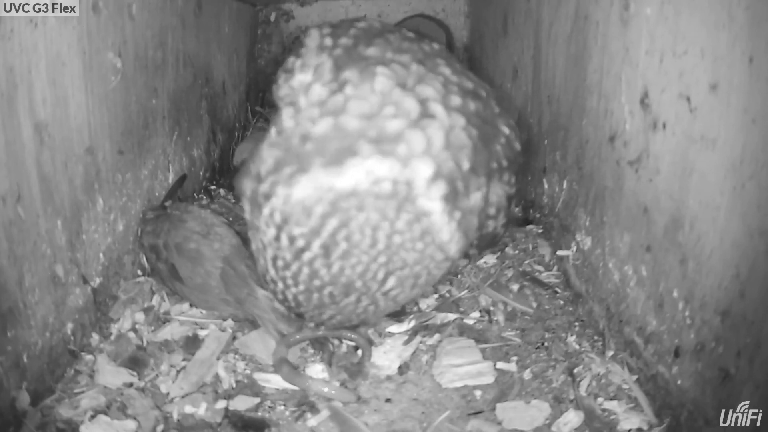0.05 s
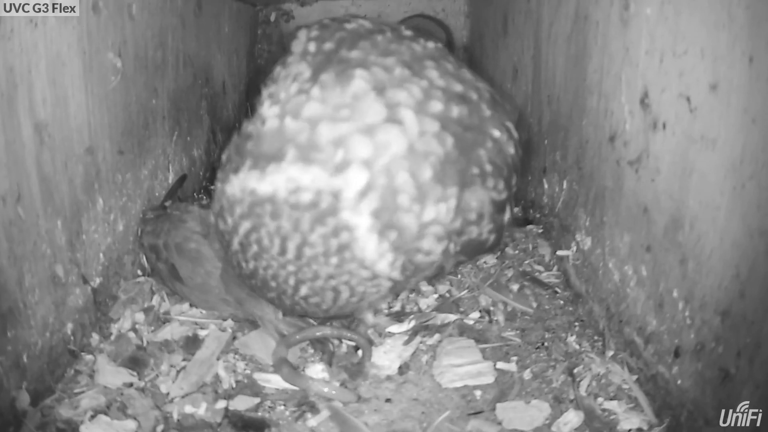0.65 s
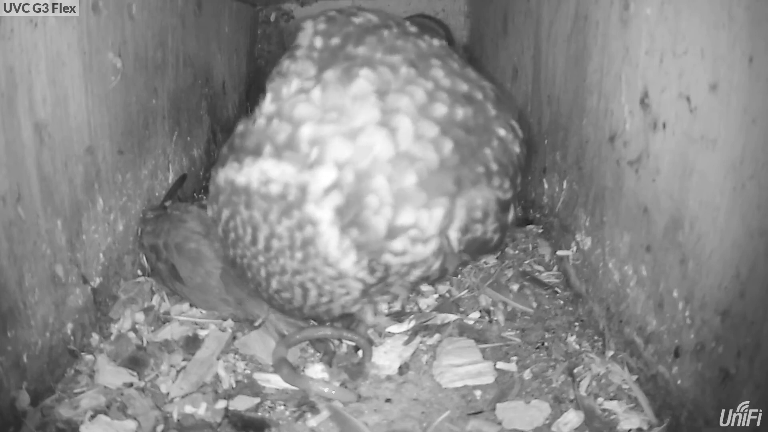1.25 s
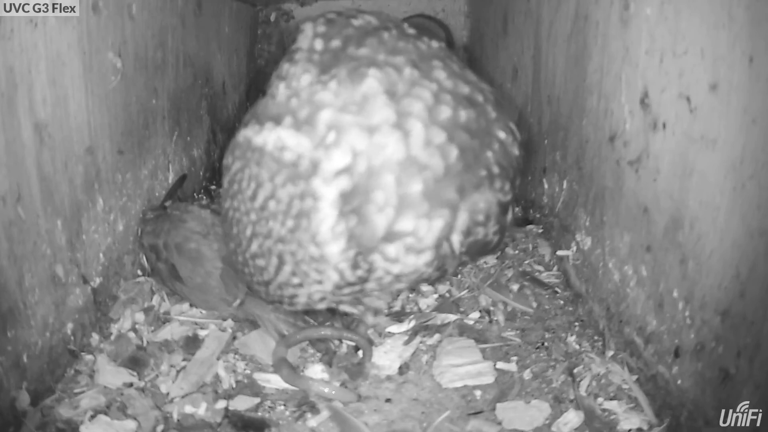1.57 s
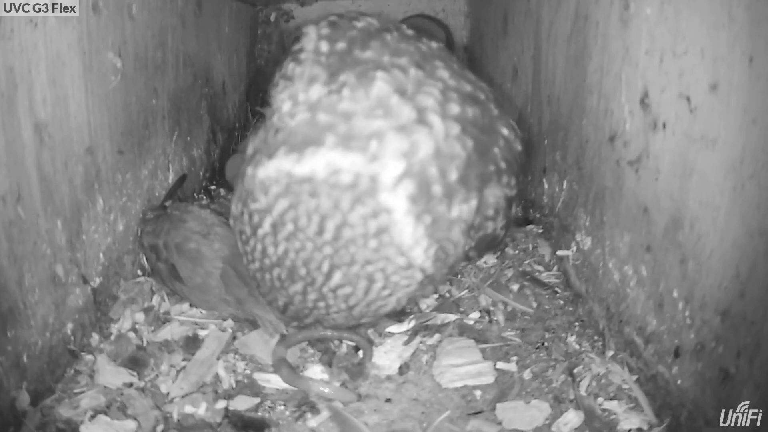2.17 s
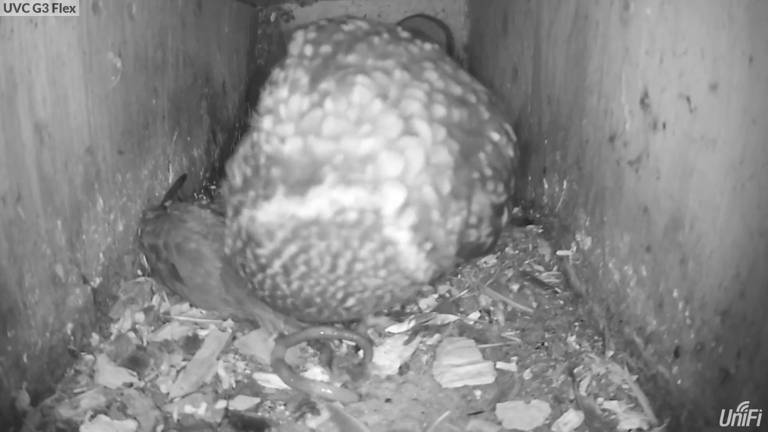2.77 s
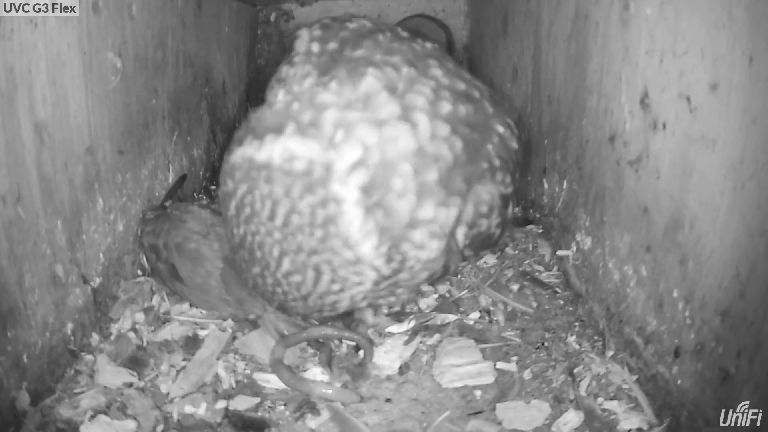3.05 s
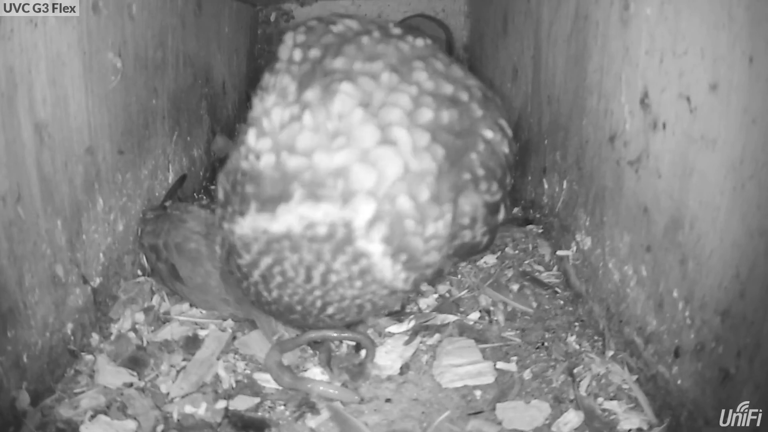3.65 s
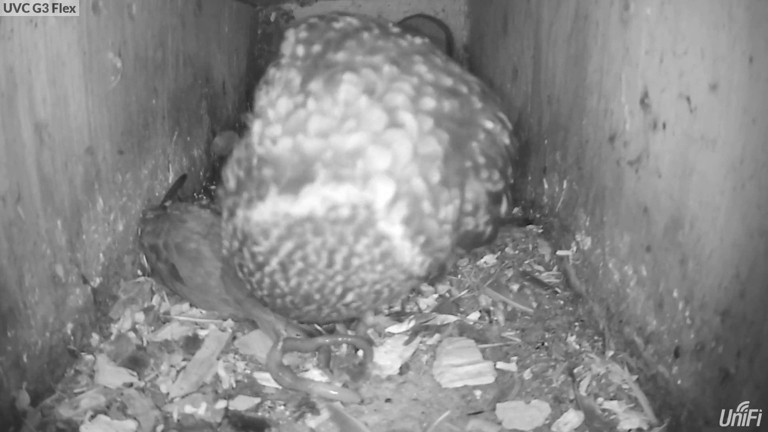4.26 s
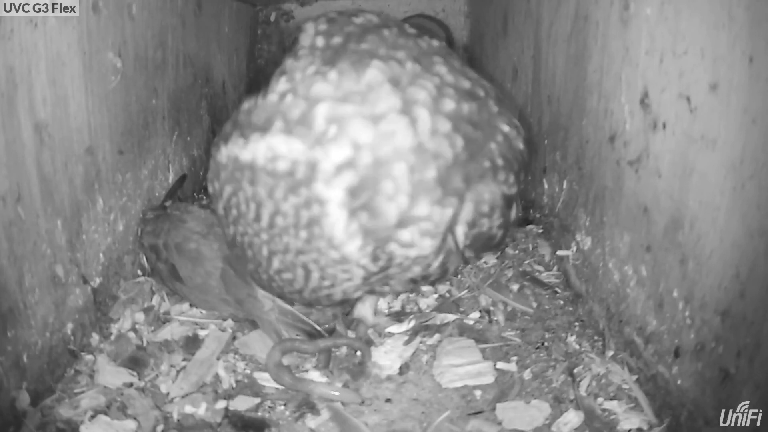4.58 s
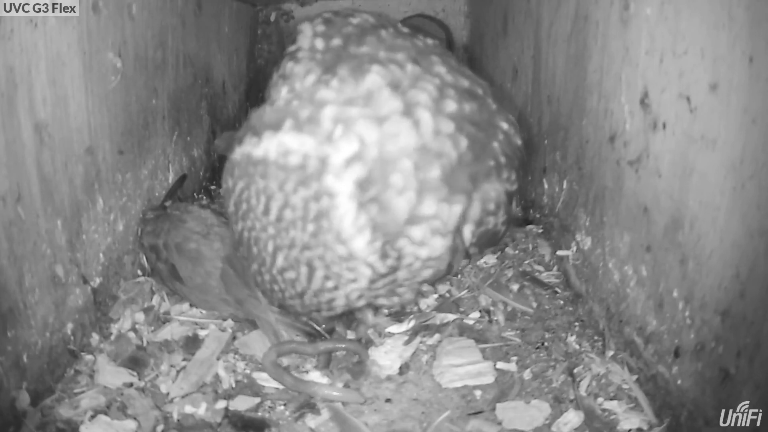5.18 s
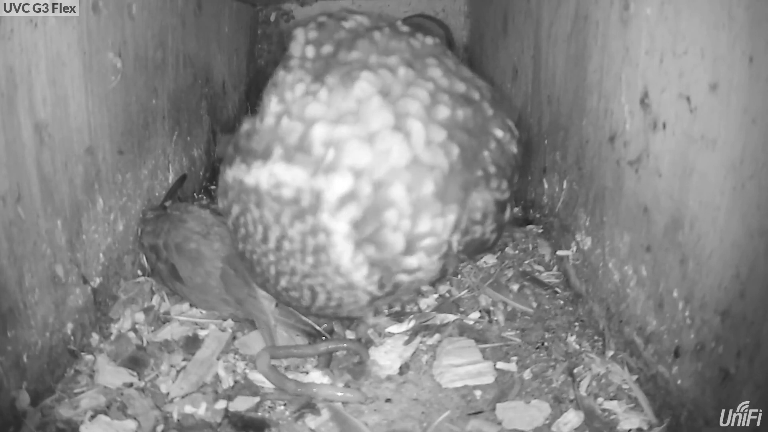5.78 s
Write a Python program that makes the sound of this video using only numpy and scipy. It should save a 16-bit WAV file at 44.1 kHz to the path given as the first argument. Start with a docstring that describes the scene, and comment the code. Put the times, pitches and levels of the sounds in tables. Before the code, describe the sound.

Close up inside a wooden nest box, claws snap and drag wood chips in irregular clicks with a short, hollow ring and a few soft thumps. A small owl twitters a few quick peeps and holds one thin squeak. Four rising, slightly raspy begging squeaks follow in two pairs as the shuffling continues over faint rustle and microphone hiss.

```python
"""Inside a wooden nest box, small owls twitter and give thin, rising begging squeaks.
Each call is an almost pure whistle from the bird's voice box, turning raspy where it strains.
Claws snap and drag the wood chips, and the box gives each snap a short, hollow ring; footsteps
set the floor ringing. Underneath lie a faint rustle of chips, the box's murmur and microphone hiss."""
import sys
import numpy as np
from scipy import signal
from scipy.fft import rfft, irfft
from scipy.io import wavfile
from scipy.ndimage import uniform_filter1d

SR = 44100
rng = np.random.default_rng(int(sys.argv[2]) if len(sys.argv) > 2 else 0)


def generate_wav(signal):
    """Clip the signal to [-1, 1] and save it as 16-bit WAV at the path in sys.argv[1]."""
    frames = np.transpose(np.atleast_2d(signal))
    scaled = np.clip(frames, -1, 1) * 32767
    pcm = np.round(scaled).astype(np.int16)
    wavfile.write(sys.argv[1], SR, pcm)


N = 265482

# the tunes of one held squeak and four rising ones: t/s, f/Hz, level/dB
HELD = [(1.803, 2174, -43.5), (1.829, 2310, -40), (1.865, 2320, -38.5), (1.989, 2262, -38.5),
        (2.001, 2310, -45)]
BEG_1 = [(2.334, 1770, -53), (2.342, 1834, -46), (2.362, 1814, -49), (2.368, 1878, -45.5),
         (2.38, 1760, -43), (2.392, 1777, -44.5), (2.422, 1853, -45), (2.466, 1860, -48.5),
         (2.554, 1983, -35.5), (2.59, 2130, -36), (2.622, 2025, -36), (2.648, 2310, -36),
         (2.657, 2150, -47)]
BEG_2 = [(2.886, 1616, -58), (2.922, 1507, -51.5), (2.936, 1625, -50.5), (2.988, 1615, -52.5),
         (3.02, 1765, -40), (3.092, 1860, -40), (3.138, 1981, -31), (3.154, 1968, -32), (3.202, 2072, -32),
         (3.236, 2307, -33.5), (3.254, 2274, -36.5), (3.261, 2270, -41)]
BEG_3 = [(4.43, 1753, -64), (4.438, 1728, -49), (4.476, 1716, -42.5), (4.502, 1665, -48.5),
         (4.526, 1795, -41.5), (4.62, 1770, -47), (4.646, 1744, -45), (4.69, 1826, -47.5),
         (4.776, 2022, -34), (4.8, 2105, -37.5), (4.811, 2190, -53)]
BEG_4 = [(5.145, 1654, -56), (5.159, 1642, -50), (5.221, 1705, -41.5), (5.241, 1791, -37),
         (5.259, 1912, -47), (5.333, 1898, -44.5), (5.387, 2196, -49.5), (5.425, 2035, -45),
         (5.461, 2195, -42.5), (5.483, 2198, -43), (5.517, 2407, -42), (5.534, 2336, -48)]
# the tone of each long squeak: tune, base overtone level/dB, extra for the upper overtones/dB
LONG_SQUEAKS = [(HELD, -63, 1), (BEG_1, -62, 1), (BEG_2, -62, 0.84), (BEG_3, -64.5, 0.94),
                (BEG_4, -59.5, -6)]
# where the voice strains: t/s, half-width/s, roughness/0-1, overtone boost/dB
RASPS = [(2.36, .03, .75, 0), (2.405, .02, .1, 6), (2.615, .013, .4, 4), (2.925, .028, .55, 0),
         (2.975, .028, .15, 13), (4.5, .016, .4, 11), (5.185, .03, .55, 3), (5.4, .04, .05, 7)]
# short peeps: start/s, length/s, f/Hz, rise to the crest/Hz, base level/dB
PEEPS = [(.809, 0.025, 2137, 165, -40), (0.892, 0.04, 2143, 176, -36.5), (.987, 0.085, 2167, 137, -37),
         (1.124, 0.015, 2110, 0, -46.5), (2.294, 0.042, 2104, 80, -46)]
# flips into a thin, high voice: start/s, time at the top/s, fall/s, top f/Hz, level/dB
FLIPS = [(.830, 0.029, 0.019, 5890, -50), (.927, 0.04, 0.0046, 6000, -51.5),
         (1.074, 0.016, 0.014, 5620, -54)]
# how the nest box's resonances colour the squeaks' overtones: f/Hz, gain/dB
OVERTONE_COLOUR = [(3300, 5.5), (3650, 6), (3900, -4.5), (4150, 1), (4600, -2), (4900, -22), (5750, -6),
                   (6400, -13), (6800, -16), (7300, -7), (7700, -15), (8200, -12), (9200, -12),
                   (10200, -20), (11600, -24), (12500, -14), (14000, -33)]
# chips snapping; thud (bass) and crack (treble) are set against the knock (middle):
# t/s, strength/dB, thud/dB, crack/dB, chip f/Hz, claw drag/0-1
SNAPS = [(0.2508, -44.5, 7, -17, 353, 0), (0.3184, -27.5, 4, -12, 427, 0.1),
         (0.3217, -25, -12, -9, 1700, 0.02), (0.7981, -18.5, -4.5, -6, 1790, 0.02),
         (0.8028, -39, 3, -13, 353, 0.1), (.9696, -42.5, 0, -8, 1050, 0),
         (1.1849, -29.5, -12.5, -3, 1620, 0.02), (1.3439, -41, -11, -4.5, 1470, .4),
         (1.499, -25, -14, -9.5, 1700, 0.36), (1.5328, -36.5, -10, -1, 1120, 0.2),
         (1.6098, -40, 3, -10, 813, 0), (1.631, -25, -11, -11, 1510, 0.02),
         (1.6838, -40, -20, -1.5, 1470, 0), (1.737, -32, -6.5, -18.5, 1110, 0.08),
         (1.79, -41.5, -8, -3.5, 985, .8), (1.8054, -25.5, -13.5, -8, 1640, .3),
         (1.919, -36.5, -10.5, -1, 1620, 0.1), (2.0944, -35, -9, -21, 1450, 0.24),
         (2.2298, -33.5, 1, -5.5, 1030, 0.9), (2.243, -40.5, -6, -12, 1700, 0),
         (2.4566, -37.5, -18, -12, 1510, 0.05), (2.4877, -38, -8, -13, 1680, 0),
         (2.5517, -38.5, -12, -4, 1530, 0.37), (2.663, -22.5, -9, -7, 1450, 0.01),
         (2.6729, -22, -22, -12, 1440, 0.23), (2.926, -39, -15, -14, 1600, 0.3),
         (2.953, -35.5, -22, -17, 1630, 0.13), (3.0891, -38, -9, -12, 1390, 0.51),
         (3.1502, -25, -12, -15, 1560, 0.02), (3.3548, -41, 5.5, -13, 853, 0),
         (3.3638, -25.5, -10, -14, 1700, .12), (3.4416, -34.5, -10, -20.5, 1130, 0.67),
         (3.4954, -36, -3.5, -15, 1490, 0.02), (3.522, -38, -12, -25, 1110, 0.52),
         (3.5404, -36.5, -7, -27, 1130, 0.34), (3.7072, -27.5, -7, -11, 1520, 0.06),
         (3.714, -15, -11.5, -11.5, 1610, 0.02), (3.919, -36.5, -30, -7, 1730, 0.27),
         (4.2107, -36, -18, -4, 1670, 0.28), (4.2212, -34, -6, -7.5, 1370, 0.3),
         (4.4166, -46, 2, -11, 1700, 0.3), (4.5138, -36, -4, -22, 1700, 0),
         (4.6301, -36.5, -11, -11, 1680, 0.08), (4.733, -28, 1, 2, 750, 0.11),
         (4.743, -23, -27, -14, 1695, 0.09), (4.934, -49, 2.5, -18, 1110, 0.1),
         (5.026, -37.5, -11, -7, 1680, 0), (5.065, -42, -18, -4, 1700, 0.28),
         (5.1779, -32.5, -17, -18, 1680, 0.17), (5.2427, -34, -16, -14.5, 1740, 0),
         (5.464, -36, -14, -9, 1440, 0.41), (5.639, -33.5, -5, -11.5, 1140, 0.73)]
# the tone colour of a wood chip: f/Hz, gain/dB
CHIP_COLOUR = [(50, -36), (95, -5.5), (150, -16), (350, -7), (680, -11), (1000, -8.5), (1800, -18),
               (2150, -19), (2550, -19.5), (4000, -21), (4800, -24), (7000, -23), (11000, -28.5),
               (15000, -37.5)]
# the pitches at which the box rings: f/Hz, width/Hz, boost/dB
BOX_RESONANCES = [(318, 126, 4.5), (531.4, 70, 9), (802, 125, 9), (1085, 227, 8.5), (1466, 110, 6),
                  (1808, 550, 13), (2980, 105, 7), (4015, 410, 7), (5530, 370, 5), (7060, 230, 4),
                  (8300, 240, 3.5), (10340, 480, 0.5)]
# footsteps: t/s, level/dB, gain of the lowest floor tone/dB
STEPS = [(.319, -45.5, -6.5), (.8, -44, -6), (3.716, -48, -2), (4.734, -57, -6), (5.313, -46.5, -22),
         (5.322, -51, -15), (5.45, -60, -8)]
# the tones of the floor boards: f/Hz, gain/dB, time to fade by 60 dB/s
FLOOR_TONES = [(98, 1.5, 0.18), (223, -4.5, 0.084), (329, -2, 0.085), (434, 1, 0.015), (575, -7, 0.059)]
# the tone colour of the steady background: f/Hz, gain/dB
MURMUR_COLOUR = [(20, -18), (45, -10), (88, -3), (135, -8.5), (175, -5.5), (210, 3.5), (255, -8),
                 (680, -17.5), (1100, -11), (1850, -10.5), (2500, -14.5), (9000, -19.5), (12000, -24),
                 (15000, -29.5)]


def owls():
    """The owls twitter with peeps and high flips, then beg with long squeaks."""
    out = np.zeros(N)
    for row in PEEPS:
        add(out, *peep(*row))
    for row in FLIPS:
        for note in flip_notes(*row):
            add(out, *high_whistle(note))
    for row in LONG_SQUEAKS:
        add(out, *long_squeak(*row))
    return out


def long_squeak(tune, overtone_db, upper_extra_db, dull_db=-12, clearing_s=0.02):
    """A begging call: its overtones come in late, follow its strength and flare where it strains."""
    times, hz, db = np.transpose(tune)
    t = np.arange(times[0], times[-1], 1 / SR)
    hz, db = np.interp(t, times, hz), np.interp(t, times, db)
    rough, flare_db = sum(np.outer(amounts, np.exp(-((t - at) / width) ** 2))
                          for at, width, *amounts in RASPS)
    bright_db = overtone_db + 0.5 * (db + 40.5)  # half a dB more for each dB of voice
    bright_db += dull_db * np.exp((times[0] - t) / clearing_s)
    upper_db = bright_db + upper_extra_db + .4 * flare_db
    return whistle(np.c_[t, hz, db, bright_db + flare_db, upper_db, rough])


def peep(start, length, hz, rise_hz, db):
    """A short note that slides up, holds, swells to a crest and drops as it stops."""
    t = np.arange(0, length, 1 / SR)
    left = length - t
    slide_hz = 110 * np.exp(-t / 0.0038)
    crest_hz = rise_hz * np.exp(-((left - 0.014) / 0.0133) ** 2)
    drop_hz = 204 * np.exp(-left / 0.0046)
    hz = hz + crest_hz - slide_hz - drop_hz
    accent_db = 2 * np.exp(-t / .014)
    swell_db = 5.5 * np.exp(-((left - 0.011) / 0.016) ** 2)
    db = db + accent_db + swell_db
    overtone_db = db - 28
    return whistle(np.c_[start + t, hz, db, overtone_db, overtone_db + 1, np.zeros(len(t))])


def whistle(rows, wander_db=2.0):
    """The bird's voice box sings an almost pure tone; when rough, its pitch and strength flutter."""
    # rows: t/s, f/Hz, main tone/dB, octave/dB, upper overtones/dB, roughness/0-1
    hz, gate, (main_db, octave_db, upper_db, rough) = glide(rows, jitter=.0025, edge_s=.004)
    rough, size = np.clip(rough, 0, 1), len(hz)
    quaver = .05 * waver(size, hz=300) + .025 * waver(size, hz=70)
    phase = 2 * np.pi * np.cumsum(hz * (1 + rough * quaver)) / SR
    flutter = 1 + .025 * waver(size, hz=35) + .4 * rough * waver(size, hz=300)
    # in a rasp, strong and weak vibrations fitfully take turns
    flutter += .45 * rough * waver(size, hz=150) * np.sin(phase / 2)
    voice = amp(main_db) * np.sin(phase)
    for k in range(2, 8):
        colour_db = db_at(OVERTONE_COLOUR, k * hz) + wander_db * min(k / 2, 2) * waver(size, hz=20)
        voice += amp((octave_db if k == 2 else upper_db) + colour_db) * np.sin(k * phase)
    return rows[0][0], np.sqrt(2) * gate * flutter * voice


def flip_notes(start, top_s, fall_s, top_hz, db, climb_s=.008, foot_hz=4470, break_hz=4870):
    """The voice climbs, breaks to a high note that sags, and may fall back; each part fades a little."""
    up, down = start + climb_s, start + climb_s + top_s
    sag_hz = 6300 * top_s
    climb = [(start, foot_hz, db), (up, break_hz, db - 2)]
    top = [(up, top_hz, db), (down, top_hz - sag_hz, db - 2)]
    fall = [(down, break_hz, db - 2), (down + fall_s, foot_hz, db - 4)]
    return [climb, top, fall] if fall_s > climb_s else [climb, top]


def high_whistle(rows, octave_db=-10):
    """One part of a flip: a faint, scratchy whistle with its octave."""
    hz, gate, (db,) = glide(rows, jitter=0.005, edge_s=0.0023)
    scratch = .018 * waver(len(hz), hz=450)
    phase = 2 * np.pi * np.cumsum(hz * (1 + scratch)) / SR
    voice = np.sin(phase) + amp(octave_db) * np.sin(2 * phase)
    return rows[0][0], np.sqrt(2) * gate * amp(db) * voice


def chip_snaps(crumble_s=0.0012, echo_s=0.003, size=4096):
    """Each chip breaks with a click and a brief crumble of fibres; the walls scatter the sound."""
    out, t, hz = np.zeros(N), np.arange(size) / SR, np.fft.rfftfreq(size, 1 / SR)
    bass = 1 / (1 + (hz / 1200) ** 8)
    treble = 1 - 1 / (1 + (hz / 2600) ** 12)
    middle = 1 - bass - treble
    crumble = 0.19 * t / crumble_s * np.exp(-t / crumble_s)
    echo = 0.12 * np.exp(-t / echo_s)
    for start, db, thud_db, crack_db, chip_hz, _ in SNAPS:
        force = rng.standard_normal(size) * (crumble + echo)
        force[20] += 1  # the click
        body_db = 6 / (1 + ((hz / chip_hz - 1) / .25) ** 2)
        force_db = 10 * np.log10(uniform_filter1d(abs(rfft(force)) ** 2, size=25))
        colour_db = chip_in_box_db(hz) + body_db - force_db  # the crumble adds grain, not colour
        # the size of the chip shares its energy between thud, knock and crack
        power = abs(rfft(force) * amp(colour_db)) ** 2
        shares = [(bass, thud_db), (middle, 0), (treble, crack_db)]
        balance_db = sum(band * (level - 10 * np.log10((band * power).sum())) for band, level in shares)
        snap = signal.fftconvolve(force, ring(colour_db + balance_db))[:size]
        knock = irfft(rfft(snap) * middle)
        add(out, start, amp(db + 3) * snap / np.sqrt((knock ** 2).sum() / 10))
    return out


def claw_scrapes(slips_per_s=2500, drag_s=.028, lead_s=.013, size=2048):
    """Around a snap, the dragged claw catches and slips in a quick run of tiny ticks."""
    out, hz = np.zeros(N), np.fft.rfftfreq(size, 1 / SR)
    treble = 1 - 1 / (1 + (hz / 2600) ** 6)
    stroke = np.hanning(round(drag_s * SR))
    for snap_s, db, _, crack_db, _, drag in SNAPS:
        bright_db = 11 + 0.86 * crack_db  # a claw that cracks sharply also drags brightly
        slips = stroke * rng.standard_normal(len(stroke)) * (rng.random(len(stroke)) < slips_per_s / SR)
        scrape = signal.fftconvolve(slips, ring(chip_in_box_db(hz) + bright_db * treble))
        scrape /= np.sqrt((scrape ** 2).sum() / len(stroke) + 1e-20)
        add(out, snap_s - lead_s, drag * amp(db - 12) * scrape)
    return out


def footsteps(size=9000):
    """An owl's weight sets the boards ringing; a heavy step bends the whole floor for a deeper sound."""
    out, t = np.zeros(N), np.arange(size) / SR
    lowest, *upper = (amp(db - 60 * t / fade_s) * np.sin(2 * np.pi * hz * t)
                      for hz, db, fade_s in FLOOR_TONES)
    for start, db, weight_db in STEPS:
        add(out, start, amp(db) * (amp(weight_db) * lowest + sum(upper)))
    return out


def chip_rustle(ticks_per_s=350, spread_db=5, still_db=-74, stirred_db=-73.5, stir_s=0.093, size=2048):
    """Countless shifting chips tick softly in the box, louder around each snap."""
    hz, t = np.fft.rfftfreq(size, 1 / SR), np.arange(N) / SR
    ticks = (rng.random(N) < ticks_per_s / SR) * rng.choice([-1, 1], N)
    strength = amp(spread_db * np.minimum(rng.exponential(1, N), 4.6))
    rustle = signal.oaconvolve(ticks * strength, ring(chip_in_box_db(hz)))[:N]
    stir = sum(np.exp(-abs(t - snap_s) / stir_s) for snap_s, *_ in SNAPS)
    return unit_level(rustle) * (amp(still_db) + amp(stirred_db) * np.sqrt(stir))


def murmur(level_db=-59.5, swell_db=0.4):
    """Steady air noise, faintly coloured by the box, and microphone hiss."""
    hz = np.fft.rfftfreq(N, 1 / SR)
    colour_db = db_at(MURMUR_COLOUR, hz) + 0.51 * box_db(hz) / (1 + (hz / 2500) ** 2)
    air = irfft(rfft(rng.standard_normal(N)) * amp(colour_db), N)
    return unit_level(air) * amp(level_db + swell_db * waver(N, hz=14))


def box_db(hz):
    """The hollow box boosts sound near the pitches at which it rings."""
    return sum(db / (1 + (2 * (hz - centre) / width) ** 2) for centre, width, db in BOX_RESONANCES)


def chip_in_box_db(hz):
    """The tone colour of a chip as heard inside the box."""
    return db_at(CHIP_COLOUR, hz) + box_db(hz)


def ring(db):
    """The short ring that one click leaves in something with this tone colour."""
    log_gain = np.log(amp(np.r_[db, db[-2:0:-1]]))
    return np.fft.ifft(np.exp(np.conj(signal.hilbert(log_gain)))).real


def glide(rows, jitter, edge_s):
    """Joins a note's points into an unsteady pitch, a gate that fades in and out, and its other curves."""
    times, *columns = np.transpose(rows)
    t = np.arange(times.min(), times.max(), 1 / SR)
    hz, *others = (uniform_filter1d(np.interp(t, times, column), size=260) for column in columns)
    gate = np.sin(np.pi / 2 * np.clip(np.minimum(t - t[0], t[-1] - t) / edge_s, 0, 1))
    return hz * (1 + jitter * waver(len(t), hz=40)), gate, others


def waver(size, hz):
    """A random wobble of typical size 1, mostly slower than hz."""
    rolloff = 1 + (np.fft.rfftfreq(size, 1 / SR) / hz) ** 2
    return unit_level(irfft(rfft(rng.standard_normal(size)) / rolloff, size))


def db_at(colour, hz):
    """Looks up a tone colour between its points, with octaves evenly spaced."""
    points_hz, db = np.transpose(colour)
    return np.interp(np.log(hz + 1), np.log(points_hz + 1), db)


def amp(db):
    """Turns decibels into a gain."""
    return 10 ** (np.asarray(db) / 20)


def unit_level(x):
    """Scales a sound to an average (rms) level of 1."""
    return x / np.sqrt(np.mean(x ** 2) + 1e-20)


def add(mix, start_s, sound):
    """Places a sound in the mix."""
    part = mix[max(round(start_s * SR), 0):][:len(sound)]
    part += sound[:len(part)]


def scene():
    """Everything inside the box, in one channel."""
    return (owls() + chip_snaps() + claw_scrapes() + footsteps() + chip_rustle() + murmur())[None]


def record(dry, low_hz=35, high_hz=15400):
    """Trims away the deepest bass and the highest treble."""
    thinned = signal.sosfilt(signal.butter(2, low_hz, "highpass", fs=SR, output="sos"), dry)
    treble_cut = signal.firwin(401, high_hz, window=("kaiser", 9), fs=SR)
    return signal.oaconvolve(thinned, treble_cut[None], "same")


dry = scene()
out = record(dry)
generate_wav(out)
```